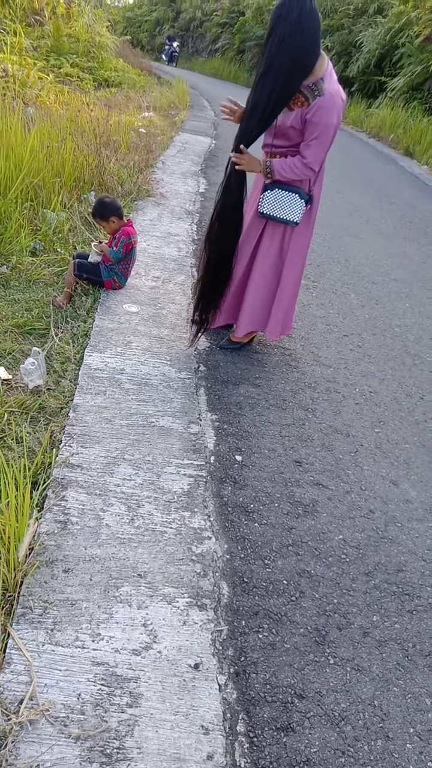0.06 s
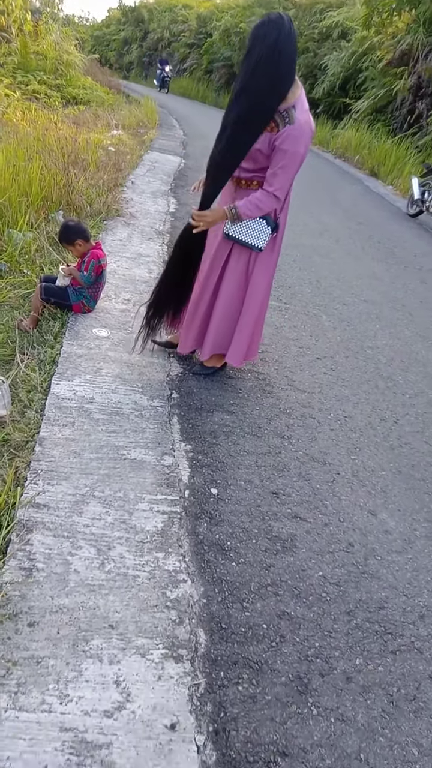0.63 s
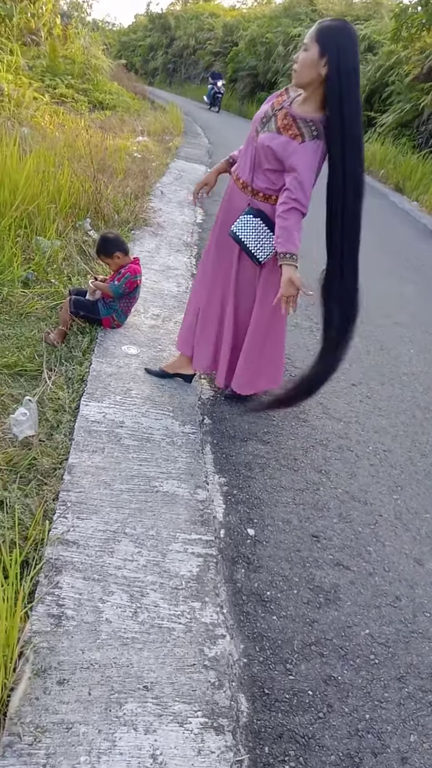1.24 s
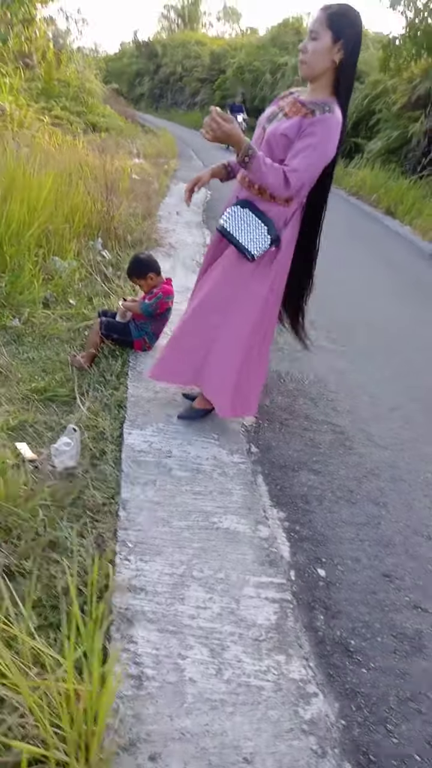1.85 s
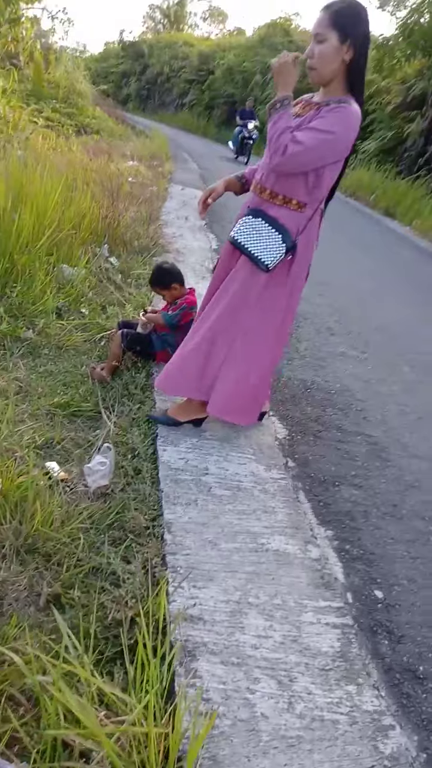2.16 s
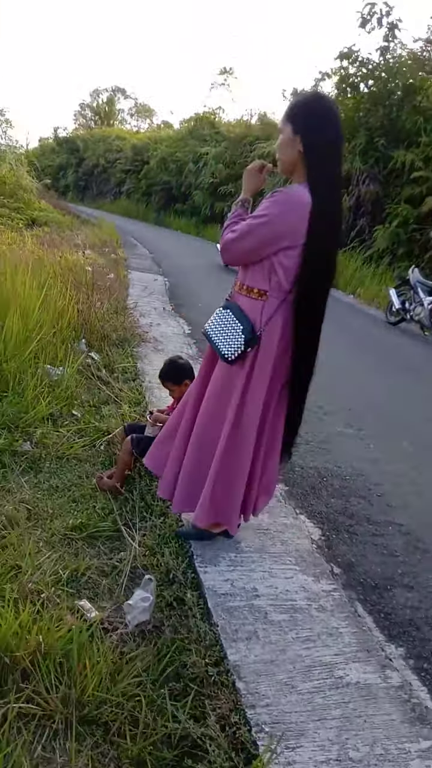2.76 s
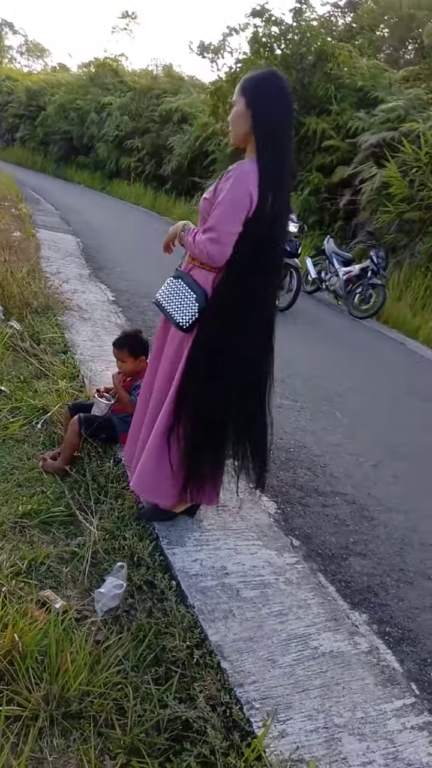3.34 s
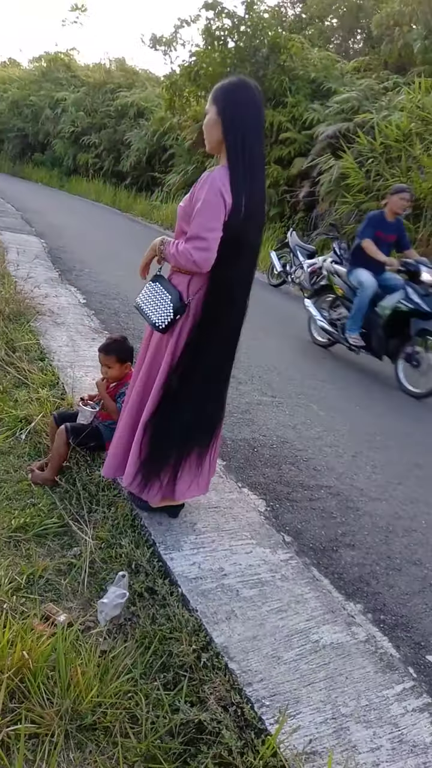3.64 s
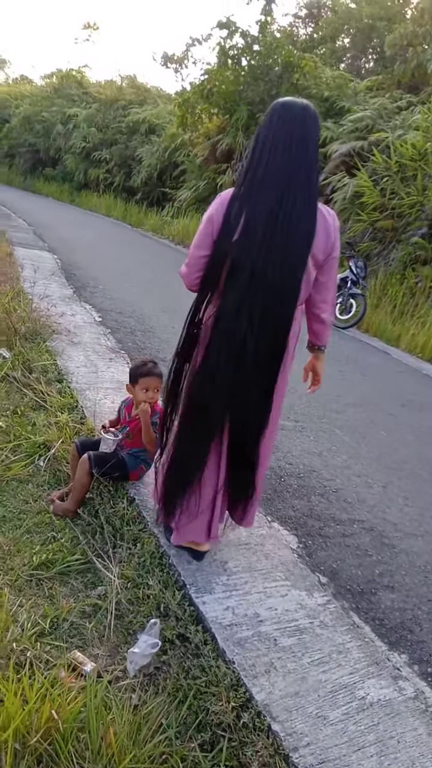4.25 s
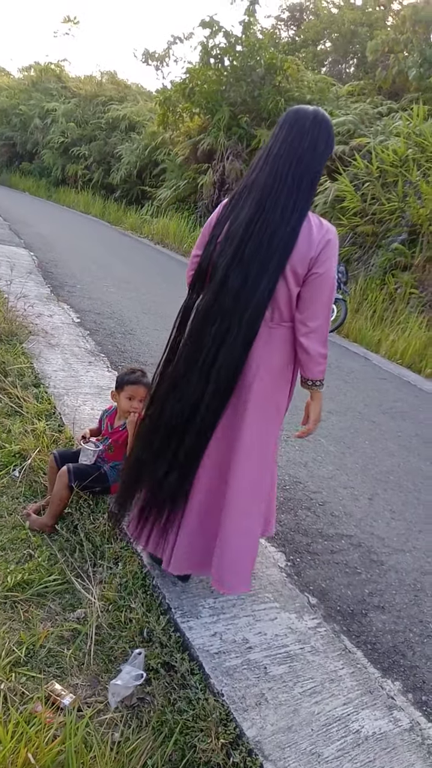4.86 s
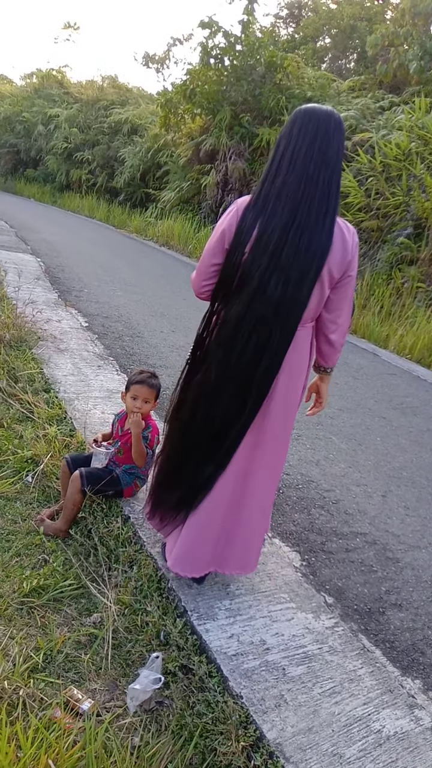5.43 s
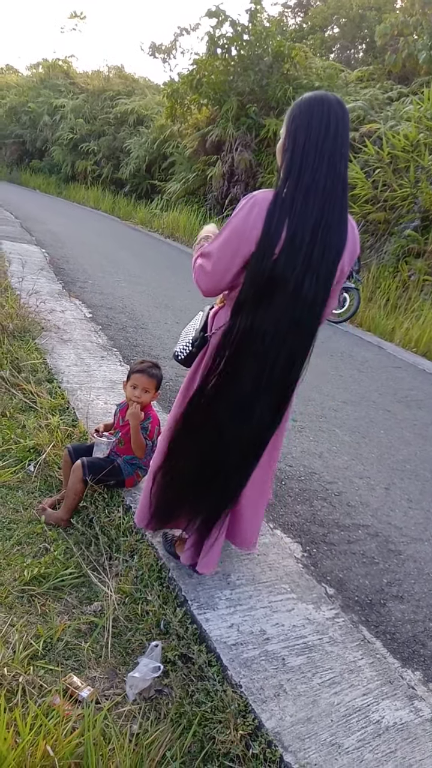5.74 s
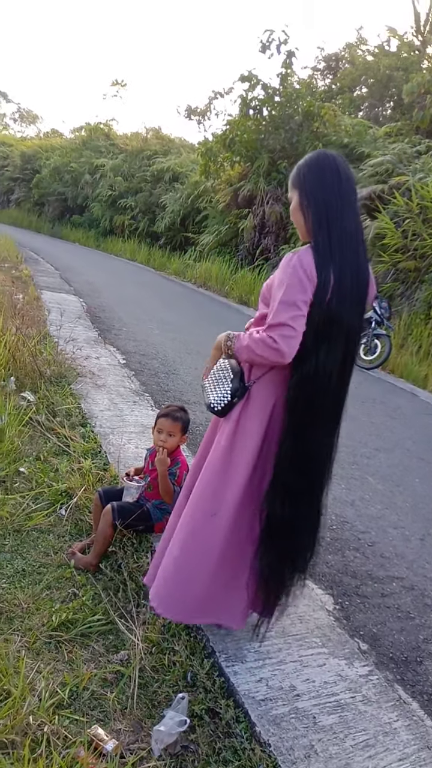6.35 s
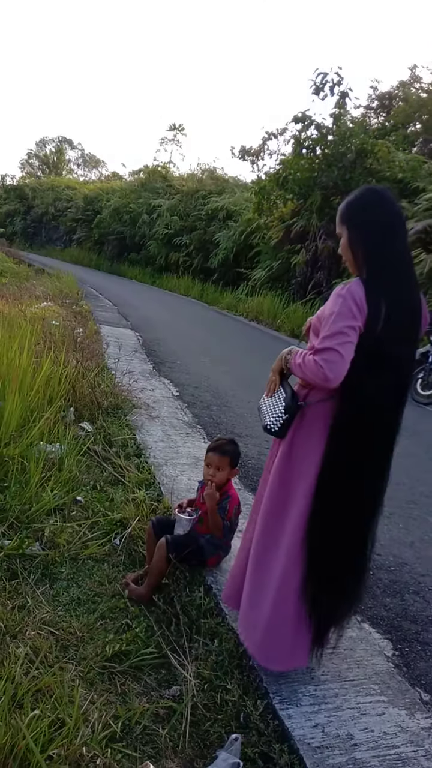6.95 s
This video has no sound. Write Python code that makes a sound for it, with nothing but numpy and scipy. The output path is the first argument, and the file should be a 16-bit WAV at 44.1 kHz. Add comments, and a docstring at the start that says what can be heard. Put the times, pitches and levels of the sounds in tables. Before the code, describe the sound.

Outdoors by a rural road, faint insect chirps and a brief low hum accompany a far-off motorcycle. Clothing brushes and clicks near the microphone while the bike approaches. Its puttering exhaust, clatter and tyre hiss peak as it goes past about halfway through, and then it recedes, the revs dropping at the very end.

```python
"""First comes the far-off thumping of a small one-cylinder motorcycle, with a low hum that soon dies away.
An insect chirps by the country road, and cloth rustles and ticks near the microphone.
The motorcycle revs up, passes close by and finally shuts its throttle. Each firing of the engine
sends a puff of gas that rings the exhaust pipe, over clattering valves, whining gears
and the hiss of chain and tyres."""
import sys
import numpy as np
from scipy import signal
from scipy.fft import rfft, irfft, next_fast_len
from scipy.io import wavfile
from scipy.ndimage import uniform_filter1d, map_coordinates

SR = 44100
rng = np.random.default_rng(int(sys.argv[2]) if len(sys.argv) > 2 else 0)


def unload_audio(sound):
    """Save the sound as a 16-bit wav file, at the path given as the first command line argument."""
    columns = np.transpose(np.atleast_2d(sound))
    # keep every value between -1 and 1, then stretch to whole-number steps
    steps = np.round(np.clip(columns, -1, 1) * 32767)
    wavfile.write(sys.argv[1], SR, steps.astype(np.int16))


N = 317079
TIME = np.arange(N) / SR


def amp(db):
    """Turn decibels into a gain to multiply by."""
    return 10 ** (np.asarray(db) / 20)


def unit(x):
    """Scale a signal to an average (rms) size of 1."""
    return x / np.sqrt(np.mean(x ** 2) + 1e-20)


def along(colour, hz):
    """Read a tone colour, a list of (f/Hz, level/dB) points, at any frequency."""
    f, db = np.transpose(colour)
    return np.interp(np.log(hz + 1), np.log(f + 1), db)


def curves(rows):
    """Join timed rows with straight lines, one curve for each column after the time."""
    times, *columns = np.transpose(rows)
    return [np.interp(TIME, times, column) for column in columns]


def wobble(rate):
    """A smooth random curve that heads for a new value rate times a second."""
    steps = np.arange(0, N * rate / SR + 1, 1 / 8)
    smooth = map_coordinates(rng.standard_normal(int(N * rate / SR) + 4), [steps])
    return np.interp(TIME * rate, steps, smooth)


def filtered(x, response):
    """Turn each frequency up or down by the gain response(hz)."""
    size = next_fast_len(N + SR // 2)
    return irfft(rfft(x, size) * response(np.fft.rfftfreq(size, 1 / SR)), size)[:N]


def noise(colour, patchy_db=0):
    """Noise of this tone colour, with random louder and softer patches in time and pitch."""
    hz, _, spectrum = signal.stft(rng.standard_normal(N), SR, nperseg=1024)
    patches = uniform_filter1d(rng.standard_normal(spectrum.shape), size=4, axis=0)
    patches = uniform_filter1d(patches, size=11, axis=1)
    gain = amp(along(colour, hz)[:, None] + patchy_db * unit(patches))
    return unit(signal.istft(spectrum * gain, nperseg=1024)[1][:N])


def ring(colour, size=8192):
    """How something with this tone colour rings after one sharp tap."""
    cepstrum = irfft(np.log(amp(along(colour, np.fft.rfftfreq(size, 1 / SR)))))
    cepstrum[1:size // 2] *= 2  # folding puts all the ringing after the tap
    cepstrum[size // 2 + 1:] = 0
    return irfft(np.exp(rfft(cepstrum)))


def add(track, start, sound):
    """Mix a short sound in at start seconds."""
    part = track[max(round(start * SR), 0):][:len(sound)]
    part += sound[:len(part)]


PASS_S, SPEED_M_PER_S, CLOSEST_M = 3.96, 8.0, 2.995


def position(behind_m=0):
    """Metres past the microphone, and distance to it, of a point behind_m behind the bike's middle."""
    past = SPEED_M_PER_S * (TIME - PASS_S) - behind_m
    return past, np.hypot(past, CLOSEST_M)


def sides(front_until_m=-11.5, front_turn_m=1.9, rear_from_m=10.13, rear_turn_m=1.6):
    """How much we hear of the bike's front, side and rear as it goes by, each from 0 to 1."""
    past, _ = position()
    front = (1 - np.tanh((past - front_until_m) / (2 * front_turn_m))) / 2
    rear = (1 + np.tanh((past - rear_from_m) / (2 * rear_turn_m))) / 2
    return np.array([front, np.maximum(1 - front - rear, 0), rear])


def heard_db(behind_m, beside_db, end_on_db, front_db, rear_db, ground_db_per_m):
    """The level of one part: it drops with distance and over the ground, and depends on its facing."""
    past, distance = position(behind_m)
    front, _, rear = sides()
    facing_db = end_on_db * (past / distance) ** 4 + front_db * front + rear_db * rear
    loss_db = 20 * np.log10(distance / CLOSEST_M) + ground_db_per_m * (distance - CLOSEST_M)
    return beside_db + facing_db - loss_db


def throttle(start_shut=0.46, open_s=1.44, shut_s=6.84, closing_s=0.072, settle_s=0.37):
    """Three curves from 0 to 1: not yet fully open, shut at the end, and only just shut."""
    unopened = np.clip(start_shut * (1 - TIME / open_s), 0, 1)
    closed = np.clip((TIME - shut_s) / closing_s, 0, 1)
    just_shut = closed * np.exp(-np.abs(TIME - shut_s) / settle_s)
    return unopened, closed, just_shut


# How often the engine fires, climbing and then falling at the end: t/s, f/Hz
FIRING_RATE = [(0.0, 25.59), (0.79, 26.08), (2.94, 30.39), (3.38, 31.03), (3.97, 33.16), (4.5, 33.79),
               (5.88, 38.6), (6.4, 39.63), (6.77, 39.54), (7.19, 34.17)]


def firings(sound_m_per_s=343):
    """Count the firings heard so far: they arrive faster as the bike nears, slower as it leaves."""
    rate, = curves(FIRING_RATE)
    past, distance = position()
    doppler = 1 + SPEED_M_PER_S / sound_m_per_s * past / distance
    return np.cumsum(rate / doppler) / SR - .07


# Tone colour of a thump from the front, side and rear, and with the throttle shut: f/Hz, level/dB
PIPE_FRONT = [(40, -42), (75, -19.5), (105, 2), (125, -9), (150, 2), (178, 0.5), (225, -21), (290, -7),
              (370, -17.5), (480, -35.5), (1000, -93)]
PIPE_SIDE = [(25, -61), (65, -2), (100, -12), (130, -3.5), (165, 5), (200, -0.5), (240, -8.5), (310, -8),
             (370, -12), (460, -27), (700, -43), (1200, -90)]
PIPE_REAR = [(40, -34), (80, -5), (115, -7.5), (150, -3), (190, 3), (230, -5.5), (270, -11.5), (330, -22.5),
             (395, -11.5), (480, -39), (1200, -75.5)]
PIPE_SHUT = [(45, -43), (80, -25), (110, -1.5), (145, 1), (185, -2), (240, -22.5), (330, -28), (450, -37),
             (900, -63)]


def exhaust(cycle, scatter_db=0.6, waver_db=0.5, burble_db=10.5):
    """One puff per firing rings the pipe, and the silencer booms at twice the firing rate."""
    unopened, closed, just_shut = throttle()
    shut, facing = unopened + closed, sides()
    level_db = heard_db(behind_m=1.2, beside_db=-23.5, end_on_db=-0.4,
                        front_db=0.36, rear_db=-9, ground_db_per_m=0.1051) + waver_db * wobble(6)
    fired = np.flatnonzero(np.diff(np.floor(cycle)))
    puffs = np.zeros(N)
    puffs[fired] = amp(scatter_db * rng.standard_normal(len(fired)))
    *driven, coasting = [unit(signal.fftconvolve(puffs, ring(pipe))[:N])
                         for pipe in (PIPE_FRONT, PIPE_SIDE, PIPE_REAR, PIPE_SHUT)]
    thump = (1 - shut) * np.sum(facing * driven, axis=0) + shut * coasting
    boom = np.sqrt(2) * np.cos(2 * np.pi * (2 * cycle - .05))
    boom_gain = amp([-28, -5.5, -8.5]) @ facing  # front, side, rear
    # a little swirling gas leaves the pipe too
    gas = amp(-19) * noise([(20, -24), (60, -11), (150, 1), (380, -5), (600, -20), (2000, -50)])
    return amp(level_db) * (amp(burble_db * just_shut) * (thump + gas) + boom_gain * boom)


# A sinking hum: t/s, f/Hz, level/dB
HUM = [(0, 134.5, -57.5), (.2, 129.9, -46.5), (.33, 122.3, -56), (.45, 108.2, -55.5), (.6, 104, -77),
       (.9, 104, -110)]


def hum():
    """A low, wavering tone that sinks and dies under the distant engine."""
    hz, db = curves(HUM)
    return amp(db + wobble(14)) * np.sqrt(2) * np.sin(2 * np.pi * np.cumsum(hz) / SR)


# Tone colour of the rattling engine case from the front, side and rear: f/Hz, level/dB
CASING_FRONT = [(200, -4), (520, -8.5), (720, -2.5), (880, -3), (1020, -6), (1250, 2.5), (1420, -3.5),
                (1700, -12.5), (2000, -6.5), (3000, -33), (9000, -38)]
CASING_SIDE = [(150, -7), (330, -1.5), (520, -3), (720, -1), (950, -4.5), (1120, 0), (1250, 2),
               (1420, -3.5), (1900, -14.5), (2600, -12.5), (5000, -63), (12000, -42)]
CASING_REAR = [(200, -15), (550, -13.5), (780, -10.5), (980, -10), (1140, -1), (1250, 3.5), (1440, -3),
               (1700, -6), (2100, -9), (2700, -36), (9000, -61)]


def clatter(cycle, slack_db=-12.5):
    """Valves rattle the engine case over the gear whine; both dip briefly when the throttle shuts."""
    _, _, just_shut = throttle()
    level_db = heard_db(behind_m=0.7, beside_db=-35, end_on_db=3.5,
                        front_db=8.5, rear_db=1.9, ground_db_per_m=0.6258)
    casing = [noise(CASING_FRONT, 2.5), noise(CASING_SIDE, 0.8), noise(CASING_REAR, 3.5)]
    beat = amp(np.cos(2 * np.pi * (cycle - .2)) + 0.5 * wobble(150))
    rattle = unit(beat * np.sum(np.sqrt(sides()) * casing, axis=0))
    return amp(level_db + slack_db * just_shut) * (rattle + gear_whine(cycle))


# Whines that swell and fade: loudest t/s, half length/s, waves per firing, relative level/dB, width/Hz
WHINES = [(0.66, 1, 31.8, -7.5, 24.9), (2.95, 0.94, 20.9, -8, 30), (4.71, 0.4, 21.4, -4.5, 170.4),
          (4.855, 0.7, 56, -10.5, 50.14), (5.437, 0.46, 21.8, -5.5, 44.8), (6.5, 0.61, 46, -7, 249.3)]


def gear_whine(cycle, trim_db=-2.5):
    """Gear teeth and chain links mesh, singing unsteady notes that follow the engine speed."""
    out = np.zeros(N)
    for loudest, half_length, multiple, db, width_hz in WHINES:
        swell = np.exp(-((TIME - loudest) / half_length) ** 4)
        phase = 2 * np.pi * multiple * cycle
        note = unit(wobble(width_hz) * np.cos(phase) + wobble(width_hz) * np.sin(phase))
        out += amp(db + trim_db) * swell * note
    return out


# Tone colour of the chain and tyres from the front, side and rear: f/Hz, level/dB
HISS_FRONT = [(700, -20), (1600, -5.5), (2400, -3.5), (2900, 1.5), (3700, 1), (4900, -1), (6200, -0.5),
              (7500, -19), (9500, -24.5), (15000, -36)]
HISS_SIDE = [(700, -19), (1600, 0), (2400, -3), (3000, 0.5), (3900, 1), (4900, -3.5), (6000, 2.5),
             (7500, -9.5), (9500, -18.5), (15000, -22.5)]
HISS_REAR = [(700, -15), (2300, 4), (2900, 0.5), (3400, -8), (4000, -1.5), (4900, -12), (5500, -1.5),
             (5950, 7.5), (6500, 1.5), (7500, 4), (9500, -12), (12000, -19), (15000, -16.5)]


def chain_and_tyres(cycle, coasting_db=-10):
    """A hiss that flutters as chain links hit the cogs in uneven bunches, softer once the bike coasts."""
    _, closed, _ = throttle()
    level_db = heard_db(behind_m=-0.5, beside_db=-29, end_on_db=-10,
                        front_db=4.5, rear_db=-7, ground_db_per_m=0.0334)
    hiss = [noise(HISS_FRONT, 3.0), noise(HISS_SIDE, 2.5), noise(HISS_REAR, 4.5)]
    links = unit(amp(1.16 * wobble(400) + 0.43 * wobble(40) + 1.2 * np.cos(2 * np.pi * (cycle - .25))))
    return amp(level_db + coasting_db * closed) * links * np.sum(np.sqrt(sides()) * hiss, axis=0)


# Tone colour of the country air: f/Hz, level/dB
AIR = [(20, -15), (100, 20), (300, 19), (700, -2.5), (2000, 5), (3200, -0.5), (5000, -1.5), (7400, 1),
       (9500, -15), (15000, -27)]


def air():
    """A faint, low rush of outdoor air that gently swells and sinks."""
    return amp(-60.5 + 3.8 * wobble(2.37)) * noise(AIR)


# When the insect sings: start t/s, end t/s
SONGS = [(.037, 1.2), (7.086, 7.15)]


def insect(start_hz=7900, end_hz=7450, length_s=0.029, every_s=0.1123, db=-56):
    """Thin, evenly spaced chirps, each starting sharply and sliding down as it fades."""
    out, progress = np.zeros(N), np.linspace(0, 1, int(length_s * SR))
    shape = np.sin(np.pi * np.sqrt(progress)) ** 2
    for start in np.concatenate([np.arange(first, end, every_s) for first, end in SONGS]):
        hz = (start_hz + (end_hz - start_hz) * progress) * (1 + .004 * rng.standard_normal())
        chirp = shape * np.sin(2 * np.pi * np.cumsum(hz) / SR)
        add(out, start, amp(db + rng.standard_normal()) * chirp)
    return out


# Tone colour of rubbing cloth: f/Hz, level/dB
CLOTH = [(600, -18), (1700, 3), (3200, 0.5), (4400, 11.5), (5400, 0.5), (7300, 7), (9000, 2), (12000, -3.5),
         (15500, -1.5)]
# Strokes of cloth: start t/s, length/s, level/dB, extra level/dB for the lower swish
STROKES = [(0.187, 0.062, -61.5, 13), (0.254, 0.13, -51, 6), (1.2, .14, -53.5, 0), (1.348, 0.29, -55, -12),
           (1.6, .09, -48.5, -6), (1.713, 0.083, -40.5, 3), (1.922, 0.11, -38, -5), (2.127, .19, -40, -2),
           (2.386, 0.12, -40, -3), (2.495, .11, -49, -12), (2.874, .13, -48.5, -9), (2.985, 0.15, -42, -7),
           (4.715, 0.065, -45, -12)]


def cloth(rise_db_per_s=300, fall_db_per_s=150, arch_db=3.5, grain_db=2.0, swish_below_hz=6000):
    """Tiny fibres slip past each other in strokes that rise, arch and fade."""
    high_gain, low_gain = np.zeros(N), np.zeros(N)
    for start, length, db, swish_db in STROKES:
        age = TIME - start
        fade_db = rise_db_per_s * np.maximum(-age, 0) + fall_db_per_s * np.maximum(age - length, 0)
        off_middle = np.minimum(np.abs(2 * age / length - 1), 1)
        stroke = amp(db - arch_db * off_middle ** 2 - fade_db)
        high_gain = np.maximum(high_gain, stroke)
        low_gain = np.maximum(low_gain, amp(swish_db) * stroke)
    slips = unit(noise(CLOTH, patchy_db=1.0) * amp(grain_db * wobble(900) + 2.0 * wobble(70)))
    swish = filtered(slips, lambda hz: 1 / (1 + (hz / swish_below_hz) ** 8))
    return low_gain * swish + high_gain * (slips - swish)


# Small snaps of cloth near the microphone: t/s, peak level/dB, f/Hz
TICKS = [(.258, -30.5, 6000), (.29, -38, 7200), (.836, -46, 13000), (1.511, -30, 8500), (1.854, -28, 7000),
         (1.880, -21.5, 2600), (1.934, -24, 4400), (1.953, -20.5, 5600), (1.984, -27, 7400),
         (2.012, -31, 7700), (2.876, -31, 5900), (3.190, -29, 7000)]


def ticks(width_octaves=0.53, rise_s=.0008, fade_s=.008):
    """Dry snaps, each a tiny burst of noise around its own pitch."""
    out, t = np.zeros(N), np.arange(SR // 25) / SR
    hz = np.fft.rfftfreq(len(t), 1 / SR)
    shape = amp(-60 * t / fade_s) * (1 - np.exp(-t / rise_s))
    for start, db, pitch_hz in TICKS:
        colour = 1 / (1 + (np.log2((hz + 1) / pitch_hz) / width_octaves) ** 2)
        burst = shape * rng.standard_normal(len(t))
        snap = irfft(rfft(burst) * colour, len(t))[:len(t) // 2]
        add(out, start, amp(db) * snap / np.abs(snap).max())
    return out


def scene():
    """Mix the passing motorcycle, the air and the small nearby sounds into one channel."""
    cycle = firings()
    mix = exhaust(cycle) + hum() + clatter(cycle) + chain_and_tyres(cycle)
    mix += air() + insect() + cloth() + ticks()
    return mix[None]


# Peaks and one dip made by the microphone's opening: f/Hz, width/Hz, level/dB
MIC_OPENING = [(1261, 37, 5), (6320, 470, 4.5), (6520, 255, -9), (7250, 780, 7.5), (15000, 670, 17)]


def record(dry, top_hz=15750):
    """The microphone's small opening colours the high notes, and nothing above top_hz gets through."""
    def response(hz):
        boost_db = sum(db / (1 + (2 * (hz - centre) / width) ** 2) for centre, width, db in MIC_OPENING)
        return amp(boost_db) * (hz < top_hz)
    return filtered(dry[0], response)[None]


dry = scene()
out = record(dry)
unload_audio(out)
```